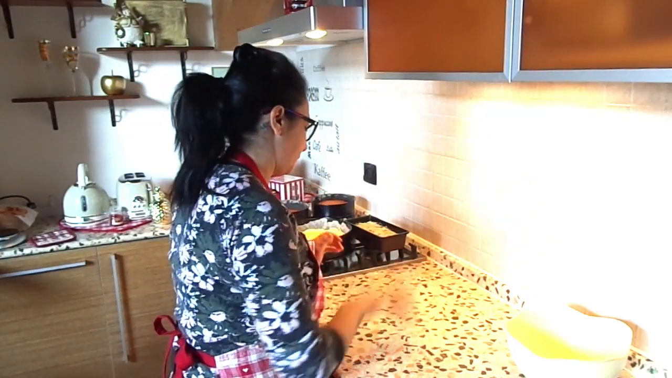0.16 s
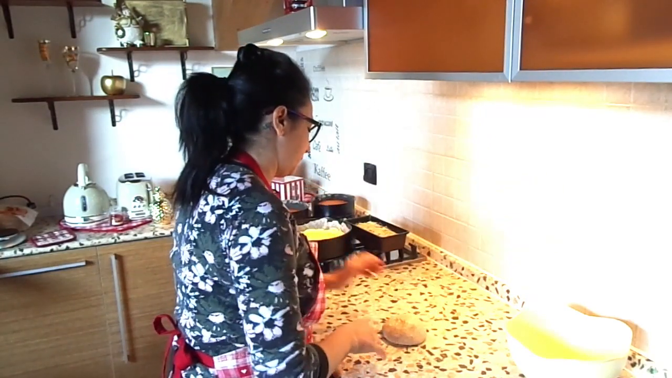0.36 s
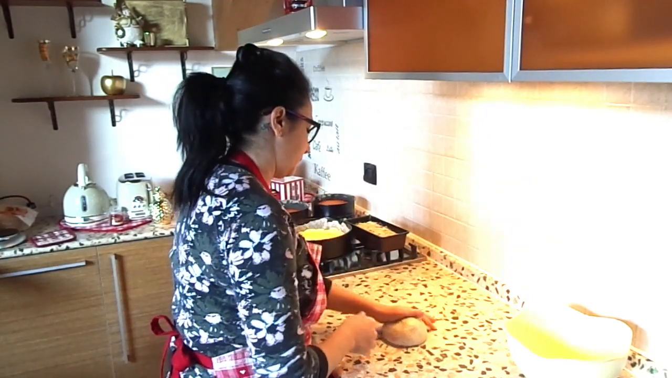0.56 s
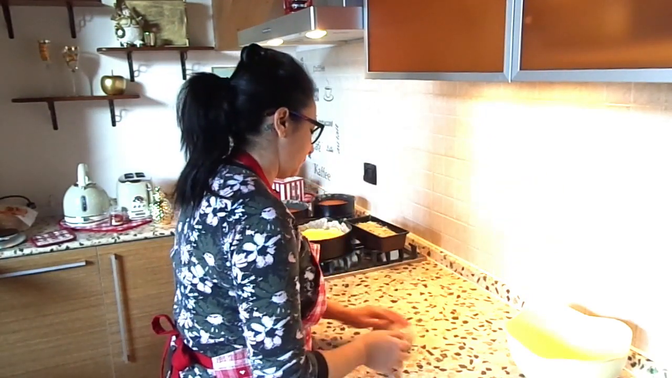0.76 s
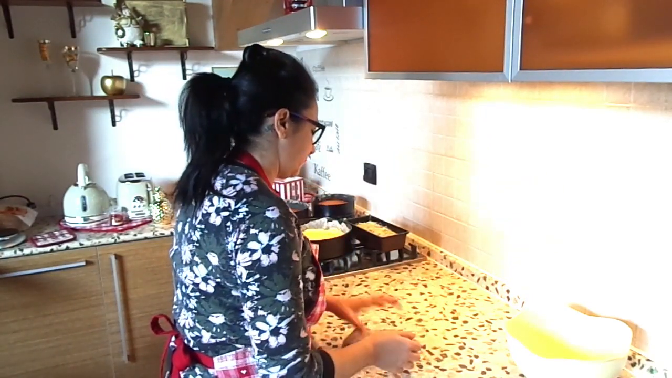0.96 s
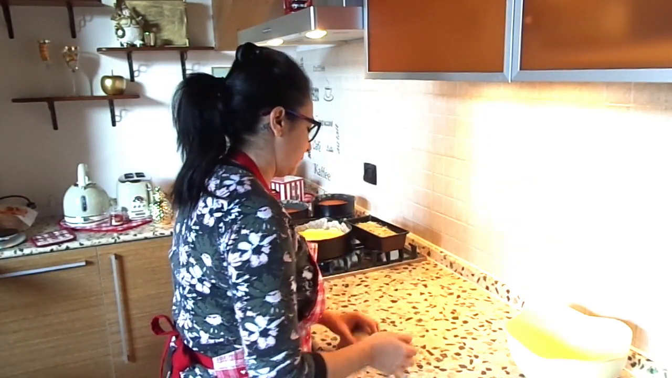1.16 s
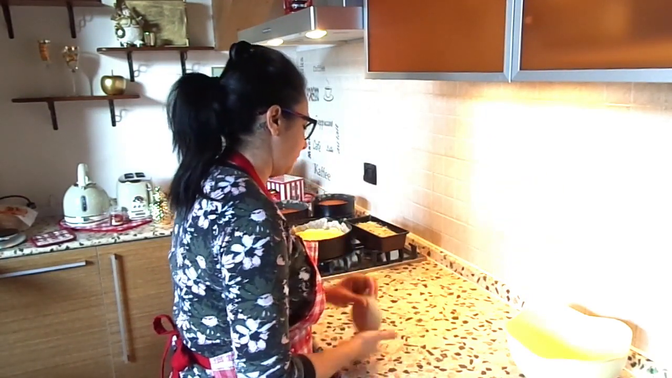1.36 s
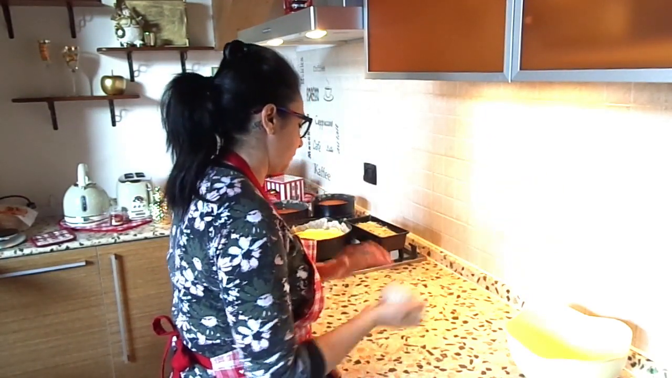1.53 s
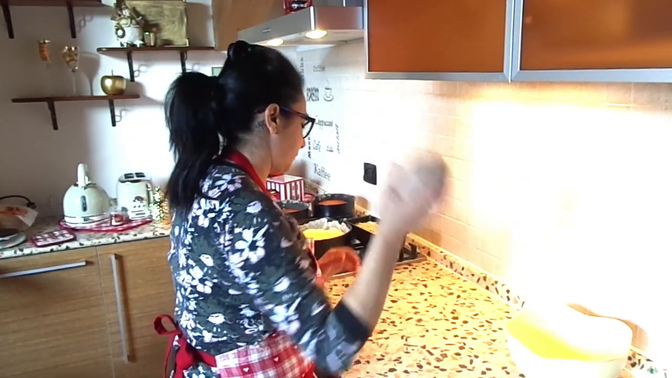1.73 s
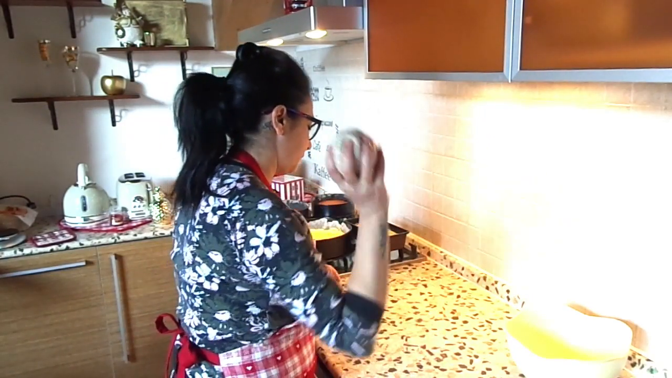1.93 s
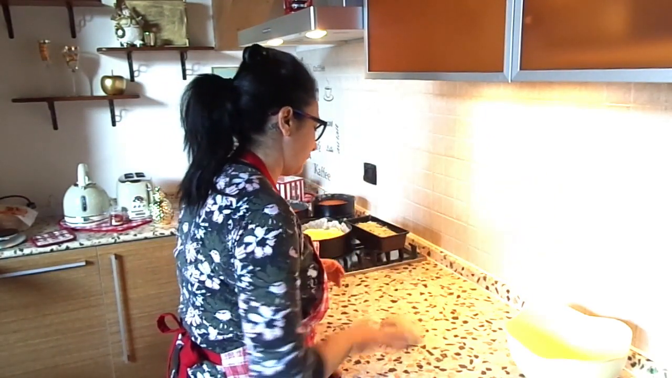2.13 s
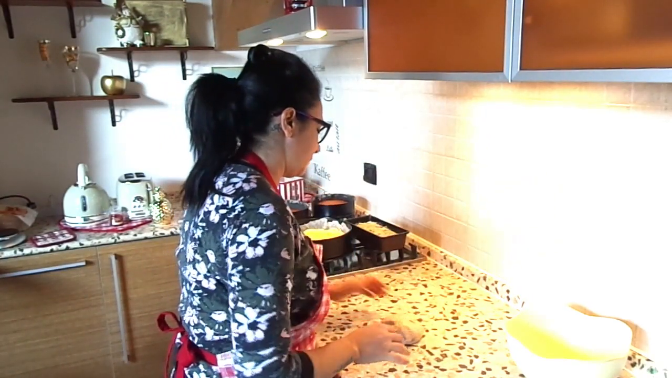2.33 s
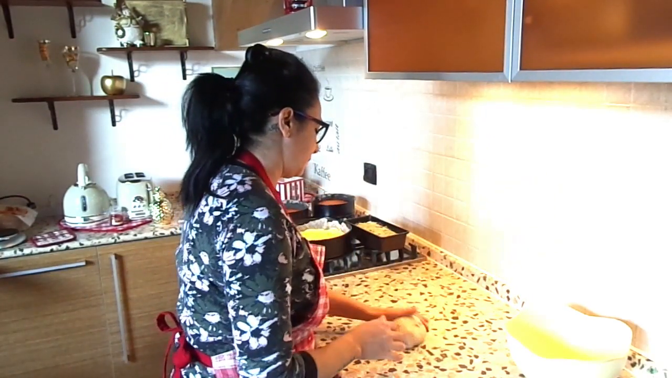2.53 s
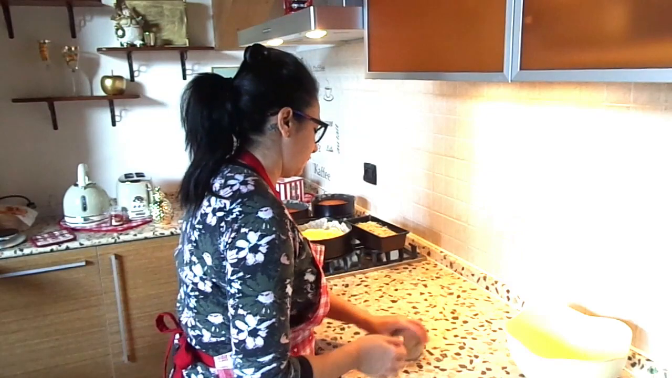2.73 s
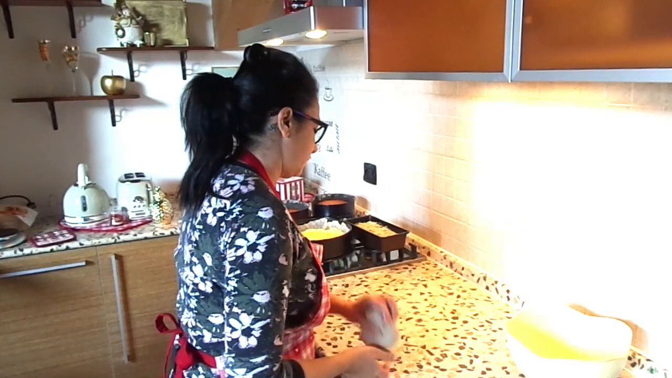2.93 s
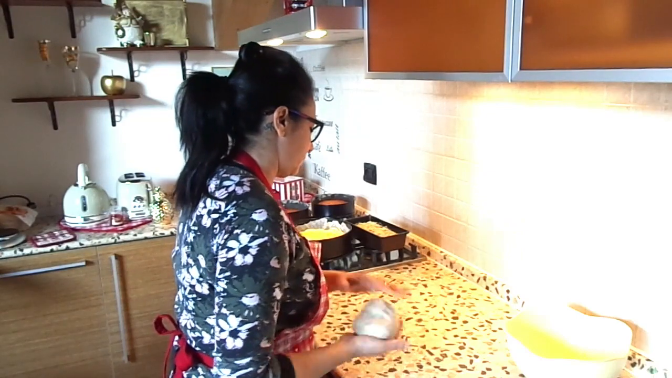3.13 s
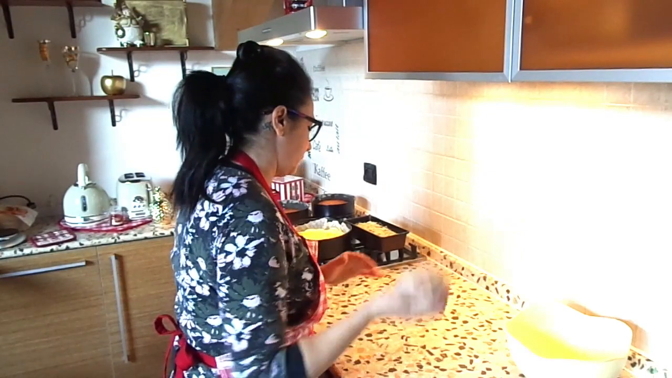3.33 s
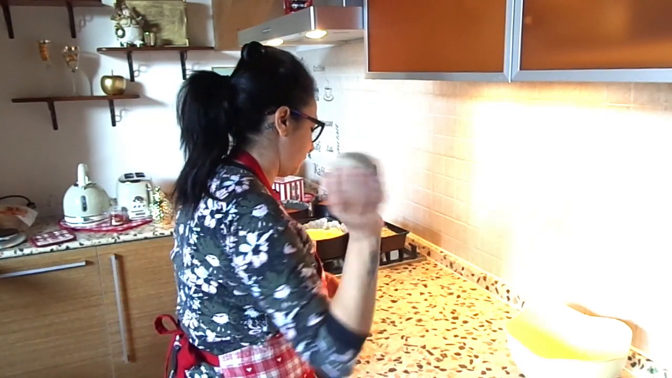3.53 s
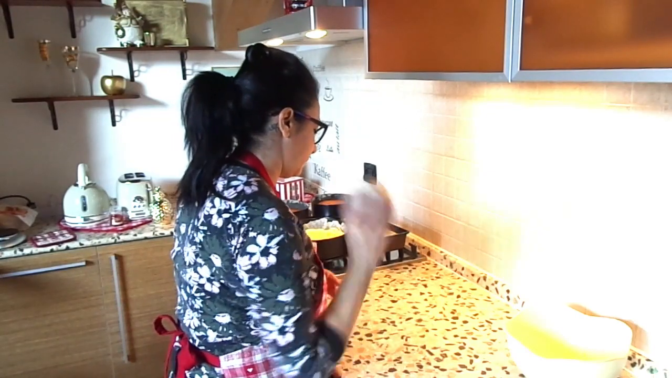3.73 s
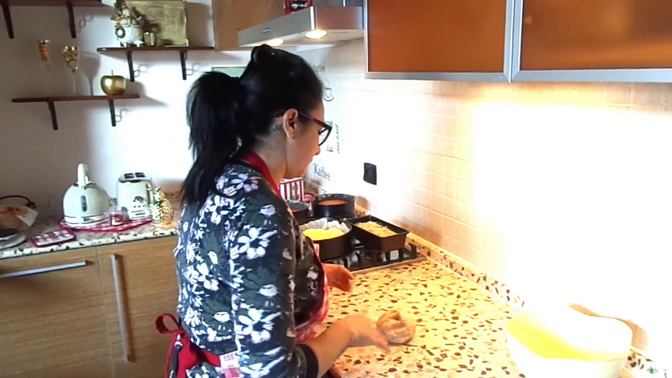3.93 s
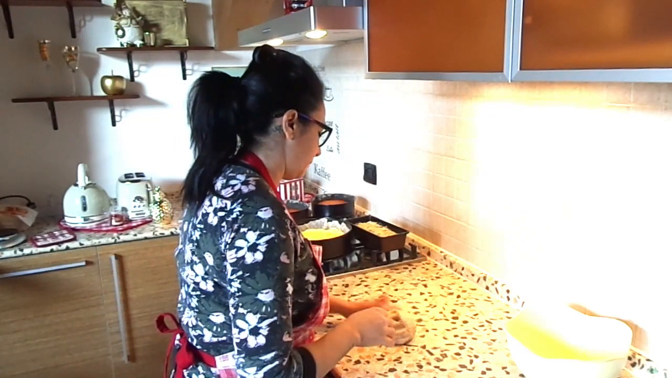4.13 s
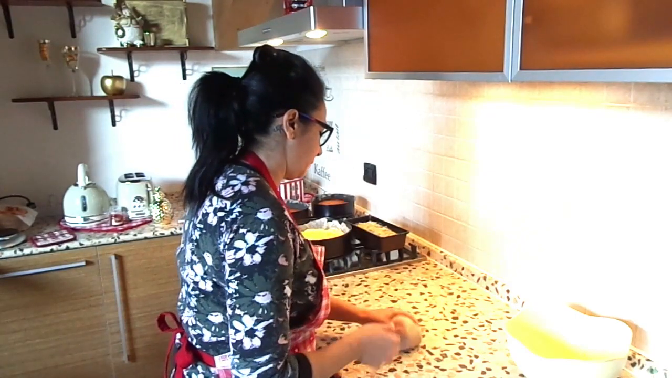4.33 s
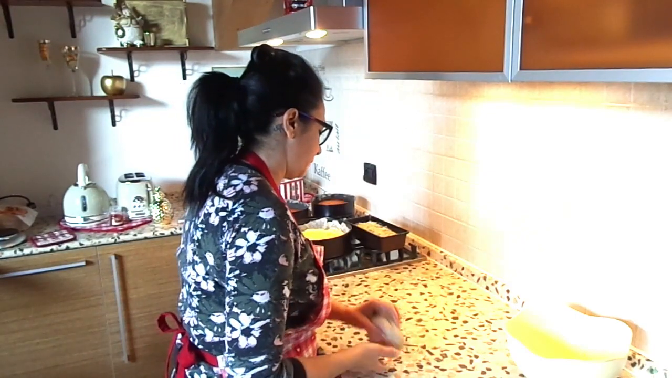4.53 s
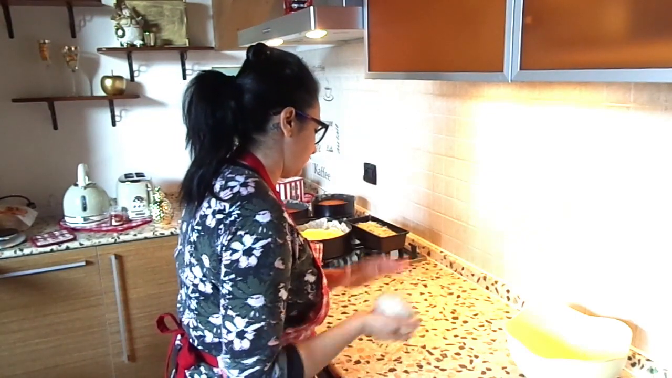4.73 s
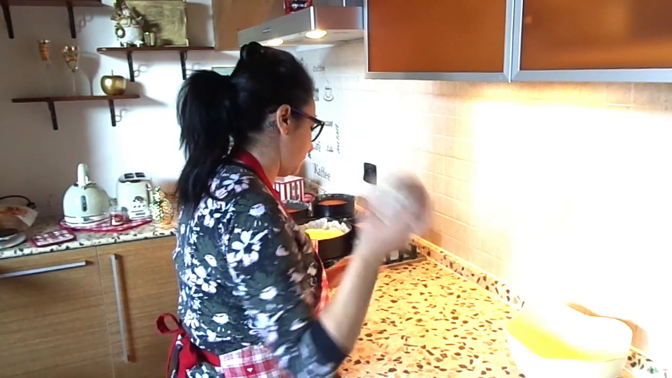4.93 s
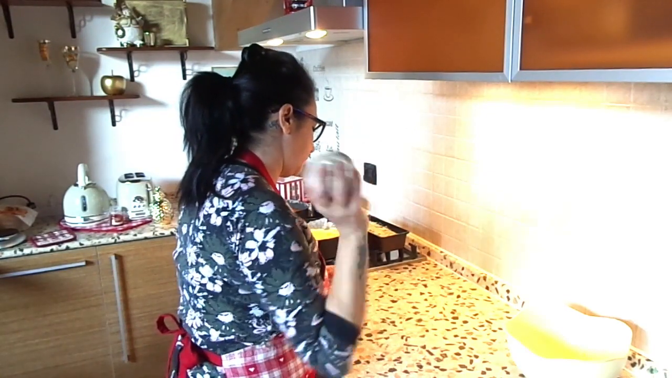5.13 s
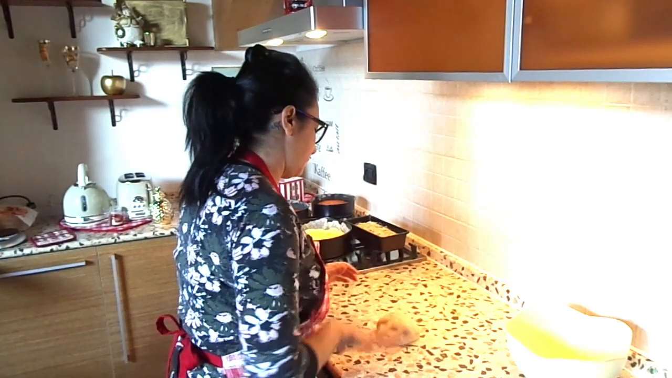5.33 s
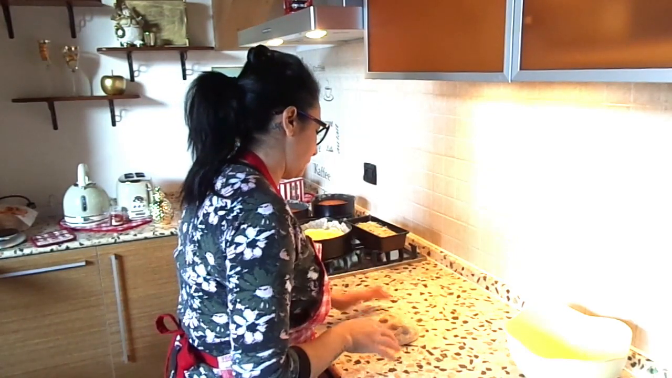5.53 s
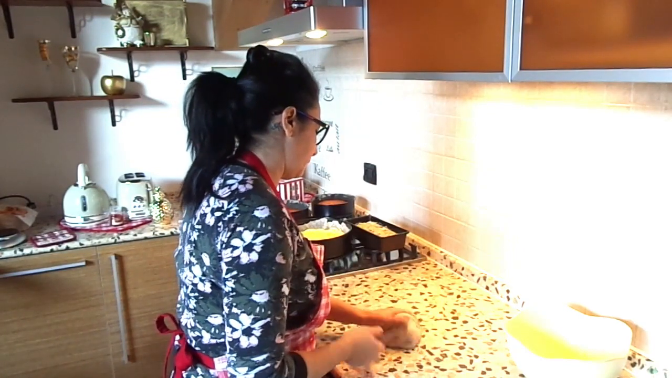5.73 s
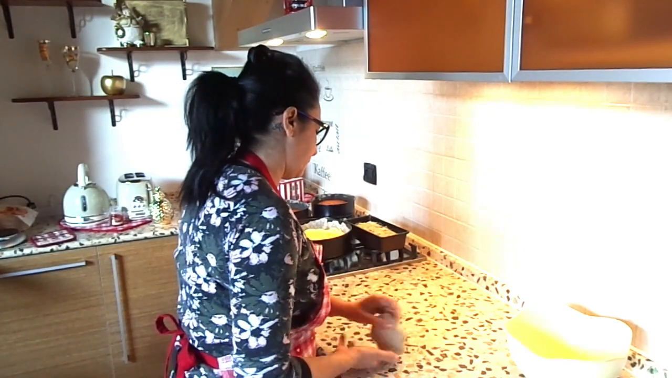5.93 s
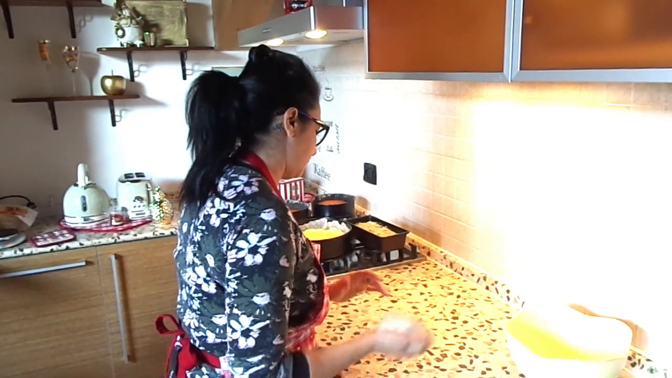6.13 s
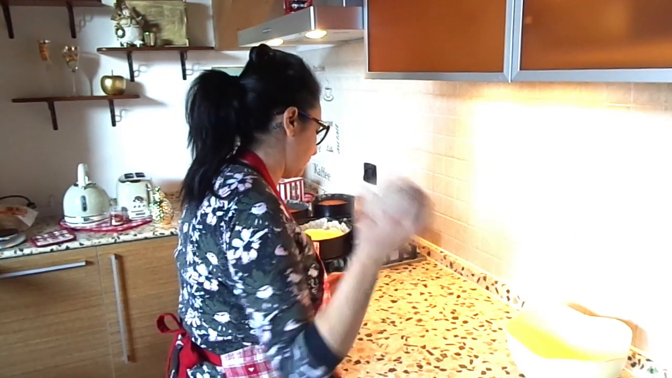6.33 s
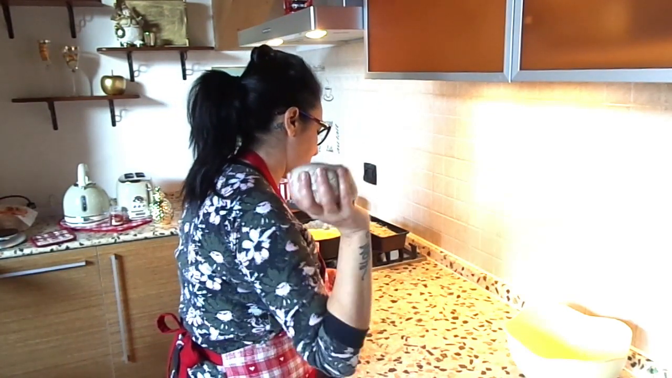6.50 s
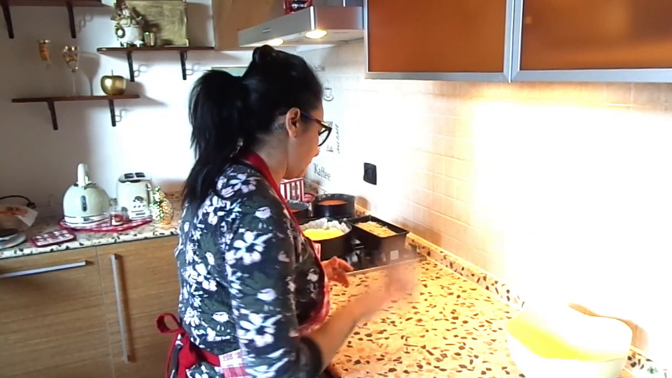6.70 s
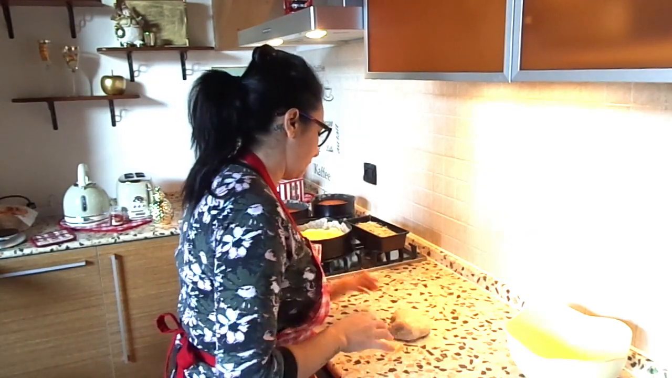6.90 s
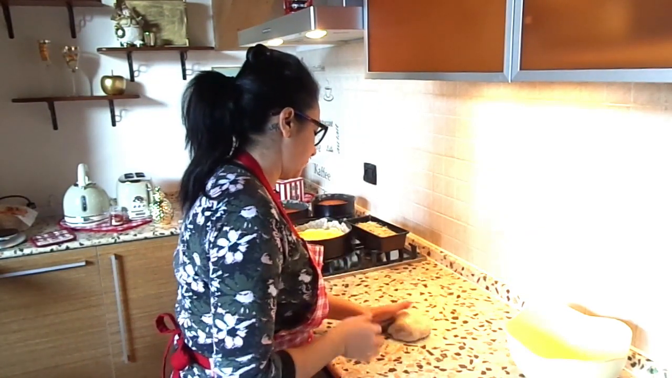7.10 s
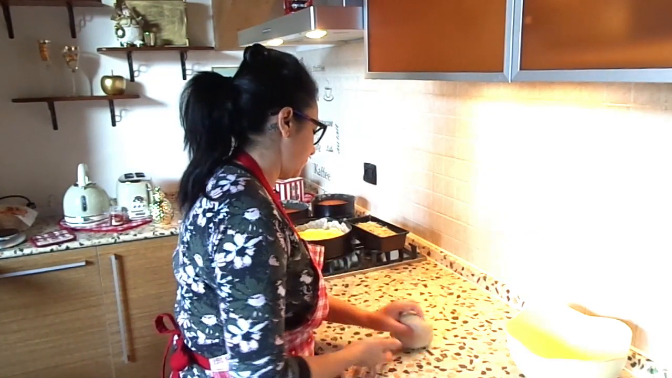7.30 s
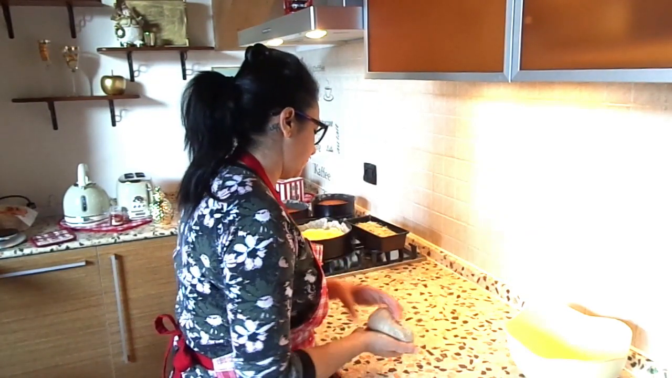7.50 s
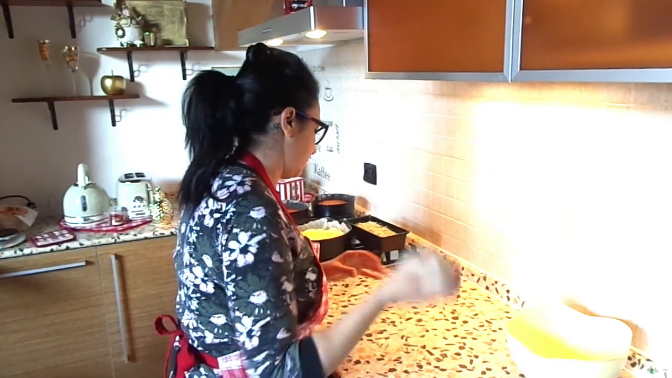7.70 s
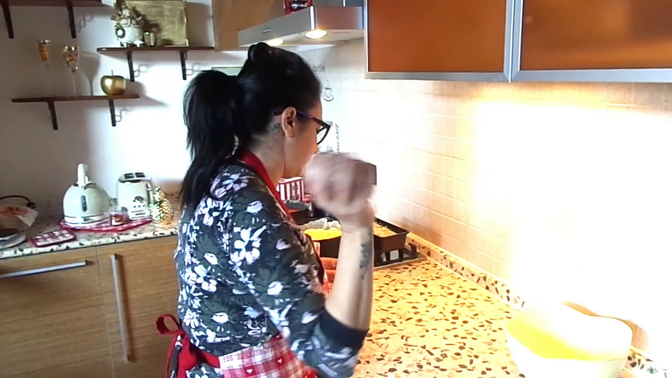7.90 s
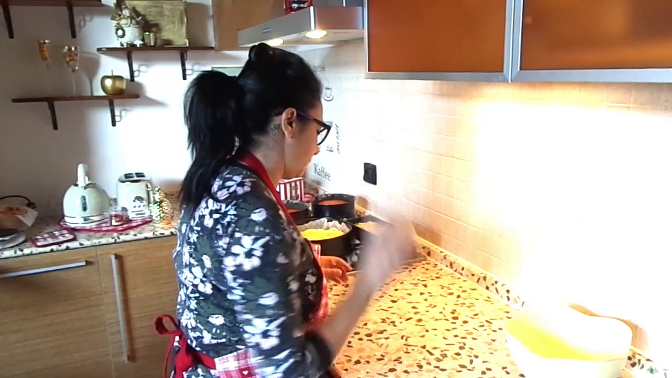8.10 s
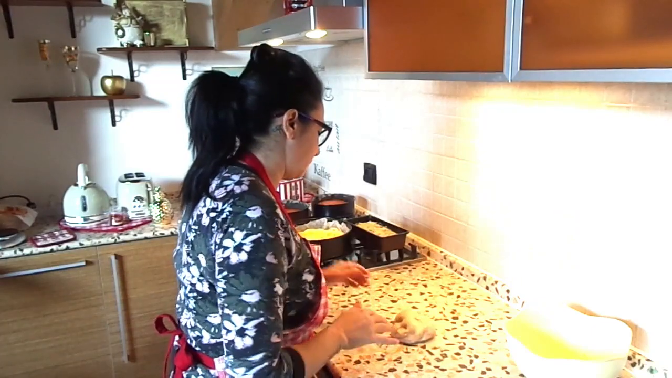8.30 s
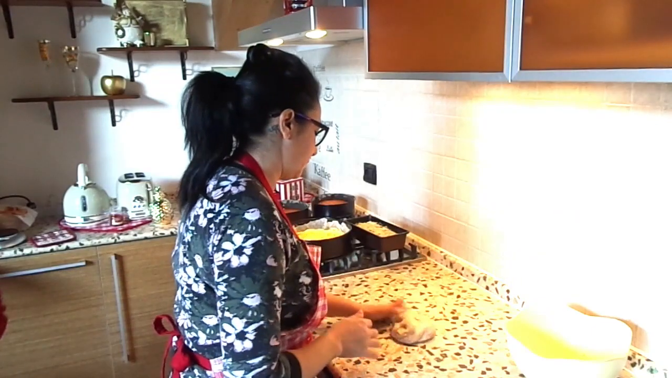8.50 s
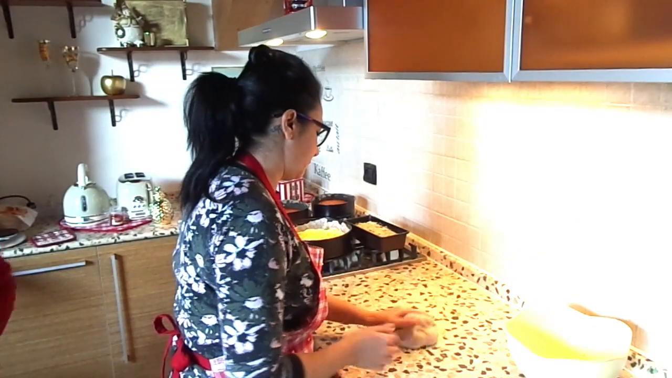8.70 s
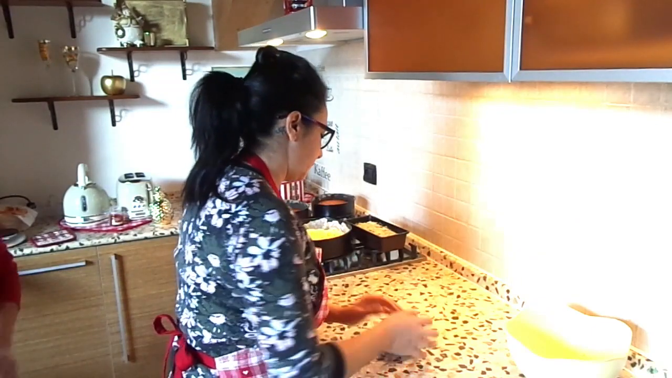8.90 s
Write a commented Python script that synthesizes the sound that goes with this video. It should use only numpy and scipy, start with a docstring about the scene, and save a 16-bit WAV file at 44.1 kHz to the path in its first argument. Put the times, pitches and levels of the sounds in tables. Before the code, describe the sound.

Soft dough slammed hard onto a stone worktop six times in a small tiled kitchen, with booming cabinets, hissing rubs and two palm claps.

```python
"""Loud cracks and booms of dough thrown on a stone worktop in a small tiled kitchen, with rattling hob ironware,
a dry rubbing hiss in strokes, two palm claps, small ticks and dull knocks, and a fan's hum under a room hush.
Impacts are filter impulse responses, ringing bodies are sums of decaying sines, and rubbing, hush and fan are
shaped noise. A dense tail carries the slaps, claps, ticks and rubbing through the room to one microphone a few
steps away; a faint haze flickers between its two nearly equal channels."""
import sys
import numpy as np
from scipy import signal
from scipy.fft import rfft, irfft
from scipy.io import wavfile
from scipy.ndimage import uniform_filter1d

SR = 44100
rng = np.random.default_rng(int(sys.argv[2]) if len(sys.argv) > 2 else 0)


def log_audio(samples):
    """Write samples as a 16-bit WAV file to the path given in sys.argv[1]."""
    # one column per channel
    frames = np.atleast_2d(samples).T
    # limit to full scale, then quantise
    limited = np.clip(frames, -1, 1)
    pcm = np.round(limited * 32767).astype(np.int16)
    wavfile.write(sys.argv[1], SR, pcm)


def natural_amplitude(level_db):
    """Convert a level in decibels to a linear amplitude factor, elementwise."""
    exponent = np.asarray(level_db, float) / 20
    return 10 ** exponent


N = 394694  # length in samples

# rubbing strokes: full_contact_s, swell_s, hold_s, level_db, hollow_share_db (grows with pressure)
RUB_STROKES = [(0.0, .01, 0.0033, -38, 6.5), (0.162, 0.062, 0.038, -49, 3),
               (0.47, 0.027, 0.014, -41.5, 5.5), (0.73, .014, 0.014, -39, 8),
               (0.759, 0.056, 0.0093, -34, 9.5), (0.904, .04, 0.16, -45, 6),
               (1.092, .02, 0.024, -43.5, 9.5), (1.152, 0.094, 0.09, -39.5, 8.5),
               (1.402, 0.0055, 0.014, -43, -2), (1.66, 0.018, 0.12, -41, 5),
               (1.798, 0.033, 0.059, -47.5, 10.5), (1.916, 0.069, 0.026, -41.5, 6),
               (2.066, 0.035, 0.024, -42.5, -1), (2.514, 0.049, 0.026, -50, 0),
               (2.581, .004, 0.024, -46, 4), (3.066, 0.038, 0.068, -43.5, 2),
               (3.177, 0.12, 0.0067, -31.5, 1), (3.377, 0.034, 0.0052, -51.5, 7.5),
               (3.446, .02, .01, -56, 1.5), (3.605, 0.052, 0.019, -36.5, 5.5),
               (3.815, 0.041, 0.0091, -57.5, -3), (3.878, .005, 0.01, -49, -1),
               (4.026, 0.14, 0.026, -39.5, 4.5), (4.235, 0.02, 0.087, -45.5, 10.5),
               (4.438, 0.012, 0.074, -48, -6), (4.574, 0.048, 0.012, -49, 5), (4.696, 0.074, .01, -48, 7),
               (4.83, .03, 0.046, -55.5, -5), (5.333, 0.15, 0.022, -62.5, 19.5)]
# spectrum of dry rubbing and of the shaken iron's hiss: frequency_hz, level_db
RUB_SPECTRUM = [(320, -24.5), (550, -17.5), (848, -10.5), (909, -10.5), (1000, -7.5), (1660, -4.5),
                (1730, -4.5), (3530, 2.5), (12700, -13.5), (14700, -19), (15500, -50)]


def throws():
    """Impact of a soft body: contact noise, a direct crack, and the delayed response of the bodies it shakes."""
    # dough on stone: start_s, slap_db, brightness_db_per_octave, crack_db, rattle_db
    throw_table = [(0.256, 8.5, -0.9, -28, -25), (2.198, 15.5, 0.06, 8.5, -31), (3.917, 3, -2, -5, -36),
                   (5.388, 11, -0.8, -6.5, -25.5), (6.815, 10.5, 0.85, 9, -60),
                   (8.246, 11, -0.84, -1.5, -30)]
    out, shake = np.zeros(N), np.zeros(N)
    for start_s, slap_db, tilt_db, crack_db, rattle_db in throw_table:
        out += slap(start_s, slap_db, tilt_db)
        add_crack(out, start_s, crack_db, tilt_db)
        add_rattle(out, shake, start_s, rattle_db)
        add_boom(out, start_s, slap_db)
    return out + room(shake, dry_db=1.0, build_s=0.0011)


def slap(start_s, level_db, tilt_db):
    """Impulse excitation: a broadband wet slap sets the stone slab ringing and fills the room."""
    # spectrum of the slap: frequency_hz, level_db
    slap_spectrum = [(110, -7), (180, -3), (1380, 0.5), (1820, -4.5), (3050, -7.5), (4940, -16),
                     (7020, -17), (10600, -31), (11600, -28), (15000, -40)]
    # worktop resonances: frequency_hz, width_hz, level_db
    slab_modes = [(564, 49, -2), (960, 41, -10.5), (1337, 126, -21), (2150, 72, -9), (3030, 45, -9)]
    dry_slap = np.zeros(N)
    add(dry_slap, start_s + 0.00099, natural_amplitude(level_db) * resonate(click(slap_spectrum, tilt_db), slab_modes))
    return room(dry_slap, dry_db=-24.0, build_s=0.00015)


def add_crack(out, start_s, level_db, tilt_db):
    """Direct sound and early reflection: the leading edge meets the stone, the tiles behind return it at once."""
    # spectrum of the crack: frequency_hz, level_db
    crack_spectrum = [(300, 5.5), (1000, 0), (2500, 6), (7000, -5.5), (9000, -24), (15000, -26)]
    crack = -natural_amplitude(level_db) * click(crack_spectrum, tilt_db)
    add(out, start_s + 0.001578, crack)
    add(out, start_s + 0.0031, natural_amplitude(-5) * crack)


def add_rattle(out, shake, start_s, level_db):
    """Repeated impact: loose iron hops and is struck again some tens of ms later, ringing and hissing."""
    # partials of the hob ironware: frequency_hz, level_db, t60_s
    iron_modes = [(3550, -12, 0.35), (5480, -9, 0.12), (7050, -10, 0.15), (8550, -9.5, 0.12),
                  (11160, -9.5, 0.14), (11600, -13, 0.036), (12150, -27, 0.034)]
    t = np.arange(6000) / SR
    # the cube makes a few blows stand out
    hops = rng.standard_normal(len(t)) ** 3 * t ** 2 * np.exp(-t / 0.011)
    hops = hops / np.sqrt(np.sum(hops ** 2))
    ringing = signal.fftconvolve(hops, ring(iron_modes, 0.4, scatter_db=2.0))
    add(out, start_s, natural_amplitude(level_db) * ringing)
    hiss = signal.fftconvolve(hops, click(RUB_SPECTRUM, 0.57))
    add(shake, start_s, natural_amplitude(level_db + 22.5) * hiss)


def add_boom(out, start_s, slap_db):
    """Modal response to a slow force: soft dough pushes for several ms, so the cabinets' boom swells late."""
    # cabinet resonances: frequency_hz, level_db, t60_s
    cabinet_modes = [(72, -3.5, 0.38), (83.4, -1, 0.24), (106.6, -15, 0.67), (135, -12, .3),
                     (187, -5.5, 0.38), (250.4, -8, 0.41), (302, -19, 0.4), (322.5, -6.5, 0.52),
                     (380, -9, .3)]
    boom_db = -32 + 0.39 * slap_db  # harder slaps boom louder
    push = np.hanning(int(0.0033 * SR))
    boom = signal.fftconvolve(push / push.sum(), ring(cabinet_modes, 1.0, scatter_db=0.5))
    add(out, start_s + 0.0042, natural_amplitude(boom_db) * boom)
    # the boom swells once more, far weaker
    swell_delay_s, swell_hz, swell_db = 0.29, 72.4, -32
    t = np.arange(SR // 4) / SR
    swell = bump(t, rise_s=0.031) * np.sin(2 * np.pi * swell_hz * t)
    add(out, start_s + swell_delay_s, natural_amplitude(boom_db + swell_db) * swell)


def rubbing():
    """Friction noise: dense tiny slips of uneven size; pressure brings up the hollow low part."""
    # resonance under the rubbing hand: frequency_hz, width_hz, level_db
    hollow_mode = [(1250, 73, -7)]
    hollow_share_db = np.transpose(RUB_STROKES)[-1][:, None]
    slip_db = 1.2 * rng.exponential(size=N) + 2.0 * walk(60) + 1.84 * walk(300)
    slips = rng.standard_normal(N) * natural_amplitude(slip_db)
    hiss = patchy(colour(slips, RUB_SPECTRUM), spread_db=2.0, size=9)
    low = signal.sosfiltfilt(signal.butter(2, 1800, "low", fs=SR, output="sos"), hiss)
    top = signal.sosfiltfilt(signal.butter(2, 6500, "high", fs=SR, output="sos"), hiss)
    body = hiss - low - top
    mixed = contact("body", 0) * body
    mixed = mixed + contact("hollow", hollow_share_db) * resonate(low, hollow_mode)
    mixed = mixed + contact("top", 0.023 * hollow_share_db) * top
    return room(mixed, dry_db=1.13, build_s=0.00031)


def contact(part, share_db):
    """Energy summation: every stroke swells, holds and dies away; overlapping strokes add in power."""
    # how fast each part of the hiss dies: part name to release_db_per_s
    release_rates = {"hollow": 160, "body": 186, "top": 230}
    full_s, swell_s, hold_s, level_db, _ = np.transpose(RUB_STROKES)[..., None]
    t = np.arange(0, N / SR, 0.001)
    lost_db = 20 * np.maximum(full_s - t, 0) / swell_s  # rises 20 dB over one swell time
    lost_db = lost_db + release_rates[part] * np.maximum(t - full_s - hold_s, 0)
    gain = np.sqrt(np.sum(natural_amplitude(level_db + share_db - lost_db) ** 2, axis=0))
    return np.interp(np.arange(N) / SR, t, gain)


def claps():
    """Cavity resonance: cupped air between palm and dough pops."""
    # palm on dough: start_s, level_db, brightness_db_per_octave, direct_share_db
    clap_table = [(6.023, 1, 2.8, -13), (6.179, 10.5, -1.2, -10.5)]
    # spectrum of the clap: frequency_hz, level_db
    clap_spectrum = [(88, -53), (150, -22), (636, -13.5), (787, -7), (1430, -6), (3540, -15.5),
                     (15000, -48)]
    # air cupped in the hand: frequency_hz, width_hz, level_db
    palm_modes = [(1060, 95, 1.5), (1390, 180, -0.5), (2610, 200, -2), (3450, 450, -2.5)]
    out = np.zeros(N)
    for start_s, level_db, tilt_db, direct_db in clap_table:
        pop = np.zeros(N)
        burst = resonate(click(clap_spectrum, tilt_db, from_hz=680), palm_modes)
        add(pop, start_s + 0.001, natural_amplitude(level_db) * burst)
        out += room(pop, direct_db, build_s=0.00028)
    return out


def knocks():
    """Narrow-band noise: soft pushes make a dull smear around one low pitch that swells and fades."""
    # hand and dough settling on the stone: start_s, level_db, pitch_hz
    knock_table = [(1.121, -65, 133), (2.955, -54, 340)]
    out = np.zeros(N)
    t = np.arange(SR // 4) / SR
    for start_s, level_db, pitch_hz in knock_table:
        smear = rng.standard_normal(len(t))
        for _ in range(2):
            smear = signal.lfilter(*signal.iirpeak(pitch_hz, 2.5, SR), smear)
        add(out, start_s, natural_amplitude(level_db) * bump(t, rise_s=0.022) * smear / smear.std())
    return out


def ticks():
    """Heavy damping: each small dry tick or tap is one sine that dies within milliseconds."""
    # ticks and taps: start_s, level_db, pitch_hz
    tick_table = [(1.4032, -20, 4280), (2.5227, -39, 4310), (2.5855, -20, 3280), (2.9764, -26, 1840),
                  (3.8096, -28.5, 3950), (3.8745, -25, 2830), (4.2085, -24.5, 3450), (4.4418, -25.5, 3270),
                  (4.567, -26, 3020), (4.6825, -35, 3530), (5.3393, -28.5, 1650), (7.2025, -36, 3430)]
    dry_ticks = np.zeros(N)
    for start_s, level_db, pitch_hz in tick_table:
        mode = (pitch_hz, 0, 0.003)  # Hz, dB, t60 s
        add(dry_ticks, start_s, natural_amplitude(level_db) * ring([mode], 0.01, scatter_db=6.0))
    return room(dry_ticks, dry_db=-8.0, build_s=0.00062)


def air():
    """Stationary noise: the room's hush, coloured by a fixed spectrum, wavers slowly over the fan."""
    # spectrum of the hush: frequency_hz, level_db
    air_spectrum = [(25, -6), (60, -27), (100, -10.5), (130, -20), (325, -14.5), (475, -13.5), (744, -13),
                    (1170, -12), (2610, -19), (3470, -21), (12500, -27.5), (14700, -28.5), (15800, -36)]
    hush_db = -57.5 + 0.45 * walk(1.54)
    return natural_amplitude(hush_db) * colour(rng.standard_normal(N), air_spectrum) + fan()


def fan():
    """Resonant filtering: noise in narrow bands gives the fan's wavering hum."""
    # bands of the fan: frequency_hz, width_hz, level_db
    fan_bands = [(492.5, 19, -66), (593, 19, -70.5), (980, 25, -82), (12275, 60, -79)]
    out = np.zeros(N)
    for hz, width_hz, level_db in fan_bands:
        band = signal.lfilter(*signal.iirpeak(hz, hz / width_hz, SR), rng.standard_normal(N))
        out += natural_amplitude(level_db + 0.84 * walk(2.96)) * band / band.std()
    return out


def haze(mid):
    """Decorrelation: random phases turn the sound into a faint side signal that flickers on and off."""
    # side relative to mid before the flicker: frequency_hz, level_db
    side_spectrum = [(100, -20), (2000, -20), (12000, -14.5)]
    f, t, z = signal.stft(mid, SR, nperseg=1024)
    turn = np.exp(2j * np.pi * rng.random(z.shape))
    side = signal.istft(z * turn * natural_amplitude(on_log(side_spectrum, f))[:, None], SR, nperseg=1024)[1][:N]
    level_db = 10 * np.log10(uniform_filter1d(mid ** 2, size=2000) + 1e-12)
    rise_db = np.maximum(level_db - np.roll(level_db, shift=3000), 0)
    loud = np.clip((level_db + 61) / 14, 0, 2)
    # open more often in loud passages, held back where the level rises
    gate = np.clip(19.0 * (walk(28) - 0.9 + 0.92 * loud - 0.29 * rise_db), 0, 1)
    return side * gate


def room(x, dry_db, build_s):
    """Reverberation: single echoes from tiles and cabinets, then a dense tail dying band by band."""
    # reverberation of the kitchen: frequency_hz, t60_s
    kitchen_decay = [(100, 0.58), (260, 0.46), (700, 0.43), (1840, 0.36), (4850, 0.37), (12800, 0.42)]
    time = np.arange(SR) / SR
    spikes_db = 3.4 * np.exp(-time / 0.017) * rng.exponential(size=SR)  # uneven at first, so single echoes show
    echoes = rng.standard_normal(SR) * natural_amplitude(spikes_db)
    echoes = echoes / np.sqrt(uniform_filter1d(echoes ** 2, size=441))
    f, t, z = signal.stft(echoes, SR, nperseg=256)
    decay = natural_amplitude(-60 * t / on_log(kitchen_decay, f)[:, None])
    tail = signal.istft(z * decay, SR, nperseg=256)[1][:SR]
    tail = tail * (1 - np.exp(-time / build_s))
    tail = tail / np.sqrt(np.sum(tail ** 2))
    return natural_amplitude(dry_db) * x + signal.fftconvolve(x, tail)[:N]


def click(table, tilt_db, from_hz=300, size=4096):
    """Minimum phase: the folded cepstrum gives a tilted spectrum its causal response, energy 1."""
    hz = np.fft.rfftfreq(size, 1 / SR)
    db = on_log(table, hz) + tilt_db * np.log2(np.clip(hz, from_hz, None) / 1000)
    cepstrum = irfft(np.log(natural_amplitude(db)))
    cepstrum[1:size // 2] *= 2
    cepstrum[size // 2 + 1:] = 0
    y = irfft(np.exp(rfft(cepstrum)))
    return y / np.sqrt(np.sum(y ** 2))


def ring(modes, seconds, scatter_db):
    """Modal synthesis: exponentially decaying partials, struck a little differently each time."""
    t = np.arange(int(seconds * SR)) / SR
    hz, db, t60_s = np.transpose(modes)[..., None]
    db = db + scatter_db * rng.standard_normal(hz.shape)
    return np.sum(natural_amplitude(db - 60 * t / t60_s) * np.sin(2 * np.pi * hz * t), axis=0)


def resonate(x, peaks):
    """Resonance: the sound plus its ring in a few band-pass modes."""
    out = x
    for hz, width_hz, db in peaks:
        out = out + natural_amplitude(db) * signal.lfilter(*signal.iirpeak(hz, hz / width_hz, SR), x)
    return out


def colour(x, table):
    """Spectral shaping: a steady sound is weighted by frequency and scaled to rms 1."""
    size = 1 << 19  # zero-padded beyond N
    gain = natural_amplitude(on_log(table, np.fft.rfftfreq(size, 1 / SR)))
    y = irfft(rfft(x, size) * gain)[:len(x)]
    return y / y.std()


def patchy(x, spread_db, size):
    """Time-frequency modulation: each region of pitch swells and dips on its own as the contact shifts."""
    f, t, z = signal.stft(x, SR, nperseg=512)
    field = rng.standard_normal(z.shape)
    for axis in (0, 1, 0, 1):
        field = uniform_filter1d(field, size=size, axis=axis)
    return signal.istft(z * natural_amplitude(spread_db * field / field.std()), SR, nperseg=512)[1][:N]


def walk(rate):
    """Low-pass randomness: levels drawn rate times a second, smoothed to a curve of spread 1."""
    k = int(SR / rate)
    steps = np.repeat(rng.standard_normal(N // k + 1), k)
    y = uniform_filter1d(uniform_filter1d(steps, k), k)[:N]
    return y / y.std()


def bump(t, rise_s):
    """Critically damped envelope: swells to 1 at rise_s and fades."""
    return t / rise_s * np.exp(1 - t / rise_s)


def on_log(table, hz):
    """Logarithmic pitch scale: a table read on a log-frequency axis."""
    f, v = np.transpose(table)
    return np.interp(np.log(np.maximum(hz, 1)), np.log(f), v)


def add(out, start_s, x):
    """Superposition: mixes x into out from start_s on."""
    i = int(start_s * SR)
    out[i:i + len(x)] += x[:len(out) - i]


def scene():
    """Superposition of all sources, with the haze added in opposite sign to the two channels."""
    mid = throws() + claps() + ticks() + knocks() + rubbing() + air()
    side = haze(mid)
    return np.array([mid + side, mid - side])


def roll_off(x):
    """The treble ends steeply here."""
    return signal.sosfilt(signal.butter(12, 16360, fs=SR, output="sos"), x)


def record(dry):
    """Band limiting and saturation: the microphone drops deepest bass and top, and rounds off loud peaks."""
    cut = signal.sosfilt(signal.butter(5, 40, "high", fs=SR, output="sos"), dry)
    cut = cut / (1 + (cut / 0.9) ** 4) ** 0.25  # soft limit at 0.9
    cut = signal.sosfilt(signal.ellip(8, 0.2, 40, 15300, fs=SR, output="sos"), cut)
    return roll_off(cut)


dry = scene()
out = record(dry)
log_audio(out)
```